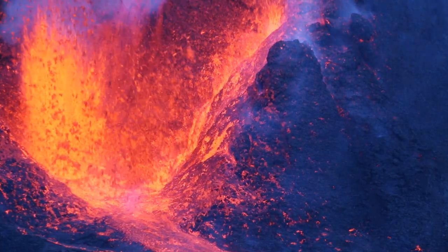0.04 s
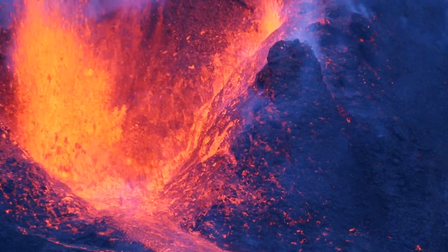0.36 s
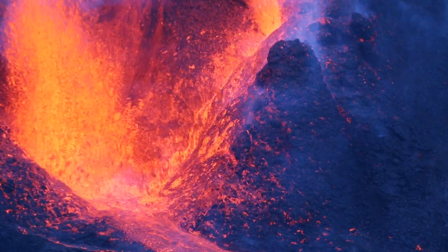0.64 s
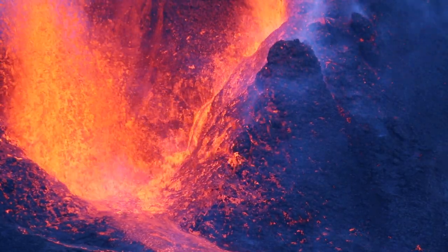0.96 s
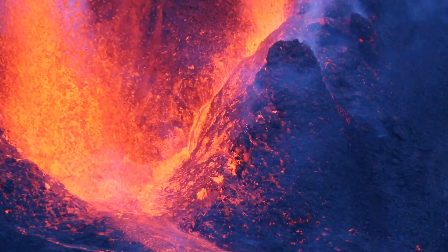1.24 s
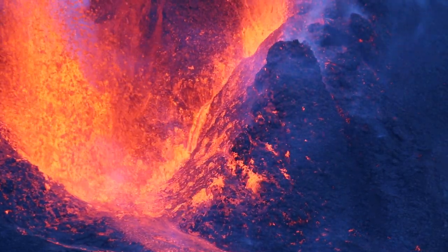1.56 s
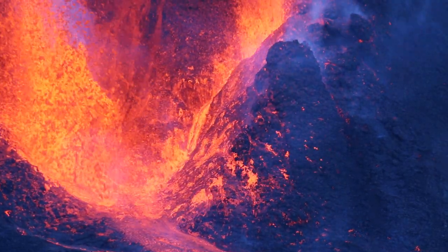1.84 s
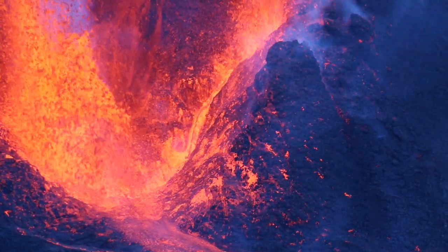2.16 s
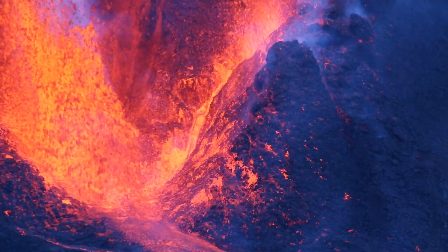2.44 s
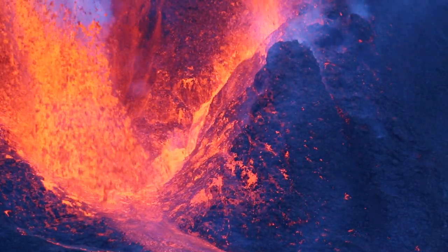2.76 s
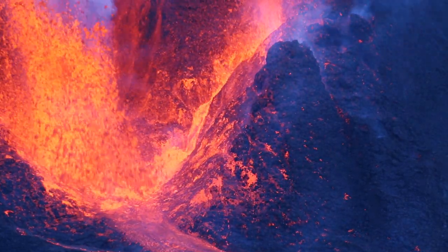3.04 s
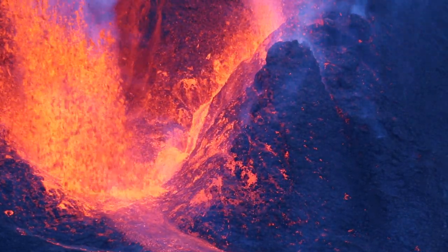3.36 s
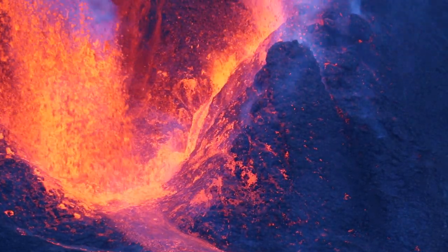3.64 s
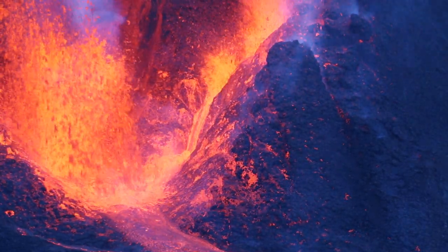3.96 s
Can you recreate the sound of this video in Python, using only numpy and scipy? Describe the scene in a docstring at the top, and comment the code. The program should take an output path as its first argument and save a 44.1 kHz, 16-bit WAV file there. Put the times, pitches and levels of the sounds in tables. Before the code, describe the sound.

A lava fountain roars, sags, then surges twice, with wind thumping on the microphone.

```python
"""On a volcano, some way from a lava fountain. Its turbulent gas jet radiates a broadband roar
with a hollow resonance in it; the jet sags, then surges twice, brighter as it drives harder.
Light wind flutters on the two microphone ports, and single eddies strike them with dull thumps.
Beneath lies the microphone's faint hiss, with a thin whine in it."""
import sys
import numpy as np
from scipy import signal
from scipy.fft import rfft, irfft, next_fast_len
from scipy.io import wavfile
from scipy.ndimage import map_coordinates

SR = 44100
rng = np.random.default_rng(int(sys.argv[2]) if len(sys.argv) > 2 else 0)


def bounce(signal):
    """Save signal as a 16-bit WAV file at the path given by the first command-line argument."""
    frames = np.transpose(np.atleast_2d(signal))
    limited = np.clip(frames, -1, 1)
    pcm = np.round(limited * 32767).astype(np.int16)
    wavfile.write(sys.argv[1], SR, pcm)


N = 176400

# jet band levels (time [s], rumble [dB], body [dB], upper body [dB], rasp [dB], treble [dB])
JET_LEVELS = [(0.02, -31, -22.5, -23.5, -25, -37.5), (0.2, -25, -26, -25.5, -29.5, -40),
              (0.37, -27.5, -24.5, -28.5, -29.0, -38.5), (0.6, -28, -29, -29.5, -31.5, -40.5),
              (0.76, -28.5, -27.5, -29, -32.0, -40.5), (0.97, -33, -31.5, -32.5, -36.5, -46),
              (1.17, -33.5, -32, -33.5, -33.5, -43.5), (1.34, -27.5, -27.5, -29, -31, -42.0),
              (1.55, -33.5, -31.5, -33, -36, -47.0), (1.8, -34, -34.5, -34.5, -38, -47.5),
              (2.1, -32.5, -33, -36, -36.5, -46), (2.38, -36.5, -33, -31, -35.5, -45),
              (2.52, -27.5, -23.5, -26, -25, -34), (2.66, -20, -21.5, -25.5, -22, -29.5),
              (2.719, -24, -21.0, -22.0, -23, -32.5), (2.779, -27.5, -27, -27, -27.5, -35.5),
              (2.95, -26, -25.5, -24.0, -23, -31.5), (3.101, -23.0, -21.0, -22.5, -23.0, -30.5),
              (3.22, -21.5, -21, -26.5, -28.5, -36.5), (3.36, -24, -25, -27.0, -28, -35.0),
              (3.5, -26, -26.5, -27.5, -30, -37.0), (3.72, -31.0, -30, -31.5, -31.5, -39),
              (3.98, -35.5, -35, -35.0, -38.0, -47.0)]
# boundaries between those bands (frequency [Hz])
JET_EDGES = [350, 1050, 1580, 2450]
# spectral shape within the bands (frequency [Hz], relative level [dB])
JET_SPECTRUM = [(20, -25), (40, -10), (65, -0.5), (110, 2), (215, 3.5), (270, 0), (345, -5), (435, 0.5),
                (550, -4), (850, -3), (1080, 1), (1240, 4), (1400, 0), (1500, -8), (1580, -18.5),
                (1680, -10.5), (1830, -5.5), (2080, -6), (2430, -14), (2850, -14), (3100, -17),
                (3350, -16.5), (3620, -27.5), (3950, -27), (4250, -32.5), (4500, -30.5), (4800, -40),
                (5120, -36), (5500, -46.5), (6300, -54.5), (8000, -74.5), (11000, -100)]
# likeness of the roar at the two ports (frequency [Hz], correlation [1])
JET_CORRELATION = [(60, 0.99), (200, 1), (1200, 0.98), (1600, 1), (2000, 0.88), (3200, 0.74), (4500, 0.64)]
# level difference between the ports (frequency [Hz], left minus right [dB])
JET_BALANCE = [(60, -.3), (600, 0), (900, -.9), (1300, 0), (1610, -1), (1850, -5), (2080, -6), (2430, 2.5),
               (2800, -2.5), (3250, 0), (3650, 2.5), (3920, -2), (4250, 1.5), (5000, 0)]
# phase difference between the ports (frequency [Hz], left lead [rad])
JET_PHASE = [(0, 0), (1380, 0.0), (1720, -0.9), (2240, 0.7), (2580, -0.3), (3100, 0.2), (3530, 0.6),
             (3790, -0.3), (4050, -0.1)]
# hollow resonance in the roar (time [s], level [dB])
HOWL_LEVELS = [(0, -30), (.9, -46), (1.35, -32), (1.9, -45), (2.25, -35.5), (2.42, -37), (2.52, -20),
               (2.62, -38), (3.2, -36), (4, -44.5)]
# puffs of wind (time [s], half-length [s], left level [dB], right level [dB])
WIND_PUFFS = [(0.117, .04, -32, -31), (.4, 0.098, -33.5, -32.5), (0.724, .025, -22, -31),
              (.85, 0.052, -28.5, -33.5), (1.022, .03, -31, -25.5), (1.188, .04, -23.5, -31),
              (1.353, 0.028, -21, -31), (1.514, 0.043, -34, -26), (1.708, 0.038, -30.5, -25.5),
              (1.797, .035, -23.5, -27.5), (1.962, 0.051, -33.5, -23.5), (2.044, .05, -30, -20),
              (2.13, 0.031, -23, -26.5), (2.205, 0.028, -23, -26.5), (2.38, 0.0067, -30, -24.5),
              (2.538, 0.018, -28, -23.5), (3.12, 0.021, -26.5, -35), (3.422, 0.027, -30, -24)]
# wind pressure at a port (frequency [Hz], relative level [dB])
WIND_SPECTRUM = [(20, -19), (35, -9), (65, 2.5), (140, 0.5), (230, -6.5), (400, -21.5), (650, -29.5),
                 (1300, -66)]
# envelope of the hiss (time [s], level [dB])
HISS_LEVELS = [(0, -71), (.2, -68), (.55, -63), (1.2, -62), (2.4, -63), (2.7, -64), (2.9, -64), (3.25, -65),
               (3.6, -63), (4, -61.5)]
# colour of the hiss (frequency [Hz], relative level [dB])
HISS_SPECTRUM = [(1000, -13), (4000, 2), (6500, 2.5), (8000, 0.5), (10500, -1.5), (13000, -3.5),
                 (15700, -9.5)]
# likeness of the hiss in the two channels (frequency [Hz], correlation [1])
HISS_CORRELATION = [(4000, .1), (12000, 0.23)]
# narrow band in the hiss (frequency [Hz], relative level [dB])
WHINE_SPECTRUM = [(10500, -49.5), (10830, -12.5), (10910, 5.5), (10990, -8.5), (11300, -53)]
# eddies that strike one port (time [s], peak [dB], cutoff [Hz], port [0 left, 1 right])
EDDIES = [(0.955, -2.5, 650, 1), (.968, -4, 282, 1), (1.003, -10, 350, 1), (1.635, -11, 300, 0),
          (1.658, -8.5, 330, 0), (2.046, -13, 400, 1), (2.149, -18, 280, 0)]

CHURN_DB, CHURN_RATE_HZ = 1.04, 14  # turbulence shared by all bands
FLUTTER_DB, FLUTTER_RATE_HZ = 0.17, 56  # each band's own turbulence
HOWL_HZ, HOWL_WIDTH_HZ = 1249, 140
BREEZE_DB, LUMP_DB = -44, 1  # wind between puffs; its unevenness
WHINE_DB = -18.5  # relative to the hiss
PORT_HZ, PORT_WIDTH_HZ = 132, 120
BAND_LIMIT_HZ = 15760


def amp(db):
    """Amplitude ratio of a level in decibels."""
    return 10 ** (np.asarray(db) / 20)


def unit_rms(x):
    """Normalisation to unit mean power."""
    return x / np.sqrt(np.mean(x ** 2) + 1e-20)


def at_frequency(points, hz):
    """Interpolation of (frequency, value) points on a logarithmic frequency axis."""
    freqs, values = np.transpose(points)
    return np.interp(np.log(hz + 1), np.log(freqs + 1), values)


def envelopes(rows):
    """Linear interpolation in time of each column after the first."""
    times, *columns = np.transpose(rows)
    return [np.interp(np.arange(N) / SR, times, column) for column in columns]


def wobble(rate_hz):
    """Smooth random modulation: a spline through Gaussian knots."""
    knots = rng.standard_normal(2048)
    return map_coordinates(knots, [np.arange(N) * rate_hz / SR], mode="wrap")


def filtered(x, response):
    """Linear filtering: the spectrum is multiplied by a frequency response."""
    size = next_fast_len(N + SR // 2)
    hz = np.fft.rfftfreq(size, 1 / SR)
    return irfft(rfft(x, size) * response(hz), size)[..., :N]


def stereo_noise(gain, correlation):
    """Coloured noise of unit rms; the ratio of mid to side power sets its correlation."""
    def mid_side_gain(hz):
        angle = np.arccos(np.clip(at_frequency(correlation, hz), -1, 1)) / 2
        return gain(hz) * np.array([np.cos(angle), np.sin(angle)])

    mid, side = filtered(rng.standard_normal((2, N)), mid_side_gain)
    return unit_rms(np.array([mid + side, mid - side]))


def band(hz, low, high):
    """Power-complementary band-pass: neighbouring bands sum to constant power."""
    power_below = lambda edge: 1 / (1 + (hz / edge) ** 24)
    return np.sqrt(np.abs(power_below(high) - power_below(low)))


def gas_jet(churn_db):
    """Jet noise: turbulence modulates the amplitude of five bands, jointly and singly."""
    edges = [1, *JET_EDGES, SR]
    roar = np.zeros((2, N))
    for level_db, low, high in zip(envelopes(JET_LEVELS), edges, edges[1:]):
        colour = lambda hz: amp(at_frequency(JET_SPECTRUM, hz)) * band(hz, low, high)
        noise = stereo_noise(colour, JET_CORRELATION)
        flutter_db = FLUTTER_DB * wobble(FLUTTER_RATE_HZ)
        roar += noise * amp(level_db + churn_db + flutter_db)
    return roar


def howl(churn_db):
    """Resonance concentrates noise in a narrow band, heard as a hollow pitch."""
    level_db, = envelopes(HOWL_LEVELS)
    peak = lambda hz: np.exp(-2 * ((hz - HOWL_HZ) / HOWL_WIDTH_HZ) ** 2)
    return amp(level_db + churn_db) * stereo_noise(peak, JET_CORRELATION)


def lava_fountain():
    """Jet and howl churn together and reach the ports with differences of level and phase."""
    churn_db = CHURN_DB * wobble(CHURN_RATE_HZ)
    roar = gas_jet(churn_db) + howl(churn_db)
    sides = np.array([[0.5], [-0.5]])  # each port takes half the difference
    balance = lambda hz: amp(sides * at_frequency(JET_BALANCE, hz))
    phase = lambda hz: sides * at_frequency(JET_PHASE, hz)
    return filtered(roar, lambda hz: balance(hz) * np.exp(1j * phase(hz)))


def wind():
    """Turbulent pressure buffets each port with independent low noise; puffs add in power."""
    t = np.arange(N) / SR
    power = amp(BREEZE_DB) ** 2
    for centre_s, half_s, left_db, right_db in WIND_PUFFS:
        puff = np.exp(-((t - centre_s) / half_s) ** 2)
        power = power + amp([[left_db], [right_db]]) ** 2 * puff
    lumps = amp(LUMP_DB * np.array([wobble(rate_hz=60), wobble(rate_hz=60)]))
    pressure = lumps * rng.standard_normal((2, N))
    buffet = filtered(pressure, lambda hz: amp(at_frequency(WIND_SPECTRUM, hz)))
    return np.sqrt(power) * unit_rms(buffet)


def hiss():
    """Microphone self-noise: a broad band and a narrow whine under one envelope."""
    level_db, = envelopes(HISS_LEVELS)
    broad = stereo_noise(lambda hz: amp(at_frequency(HISS_SPECTRUM, hz)), HISS_CORRELATION)
    whine = stereo_noise(lambda hz: amp(at_frequency(WHINE_SPECTRUM, hz)), HISS_CORRELATION)
    return amp(level_db) * (broad + amp(WHINE_DB) * whine)


def eddy_thumps():
    """Impulse response: each eddy's soft push excites the damped resonance of one port."""
    out = np.zeros((2, N))
    resonance = lambda hz: 1j * hz * PORT_WIDTH_HZ / (PORT_HZ ** 2 - hz ** 2 + 1j * hz * PORT_WIDTH_HZ)
    rolloff = lambda hz: 1 / (1 + 1j * hz / 1200)
    for onset_s, peak_db, cutoff_hz, port in EDDIES:
        soften = lambda hz: 1 / (1 + np.sqrt(2) * 1j * hz / cutoff_hz - (hz / cutoff_hz) ** 2)
        push = signal.unit_impulse(N, round(onset_s * SR))
        thump = filtered(push, lambda hz: resonance(hz) * soften(hz) * rolloff(hz))
        out[int(port)] -= amp(peak_db) * thump / np.abs(thump).max()
    return out


def scene():
    """Superposition: the sources add linearly in each channel."""
    return lava_fountain() + wind() + hiss() + eddy_thumps()


def record(dry):
    """An ideal low-pass filter removes everything above the band limit."""
    return filtered(dry, lambda hz: hz < BAND_LIMIT_HZ)


dry = scene()
out = record(dry)
bounce(out)
```